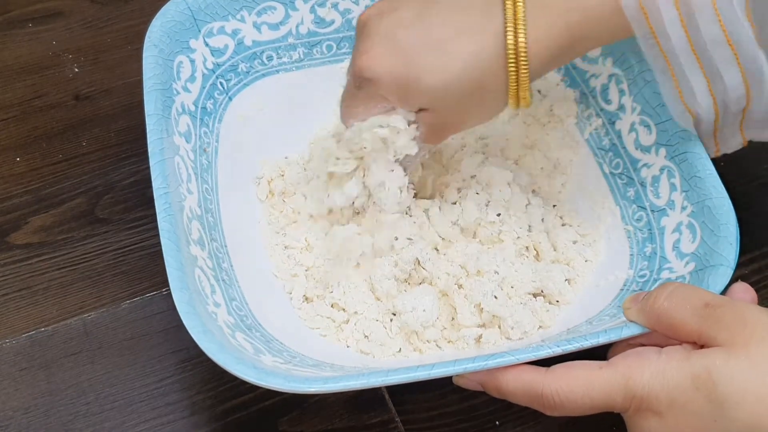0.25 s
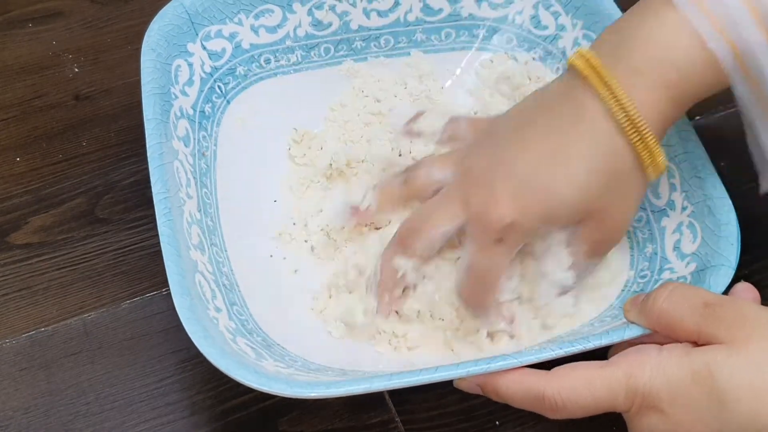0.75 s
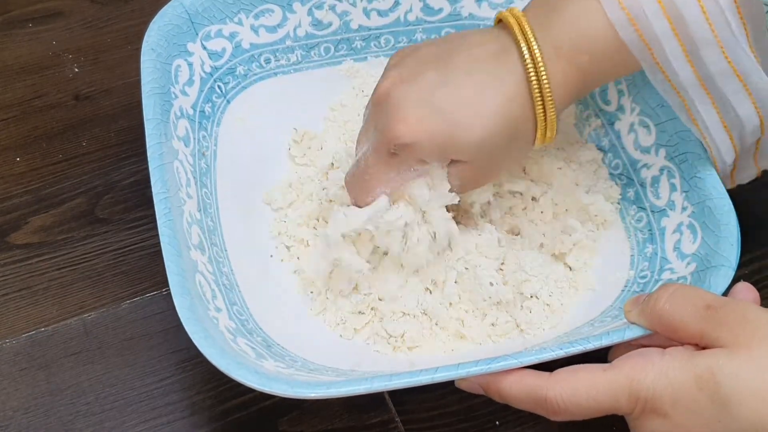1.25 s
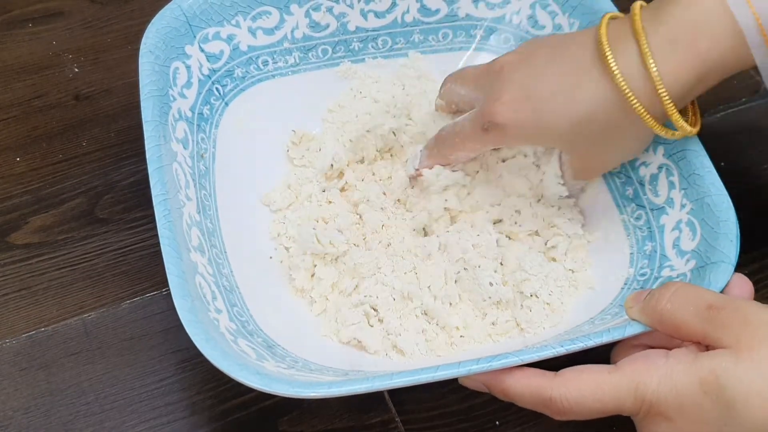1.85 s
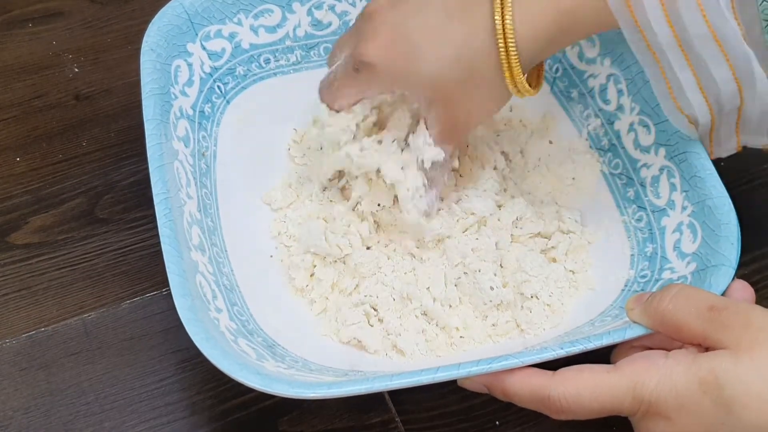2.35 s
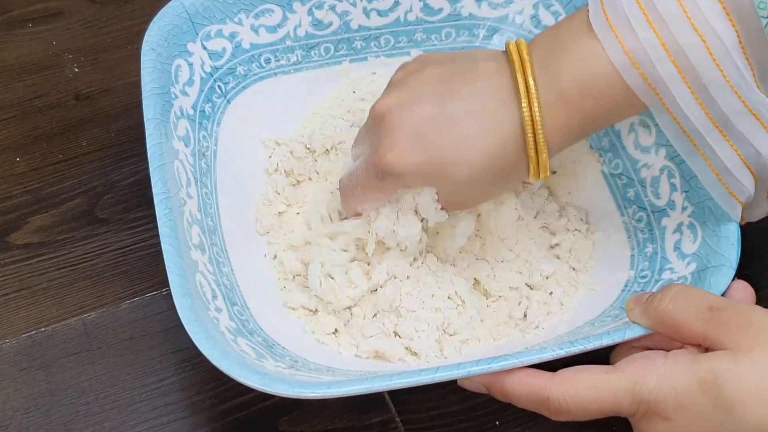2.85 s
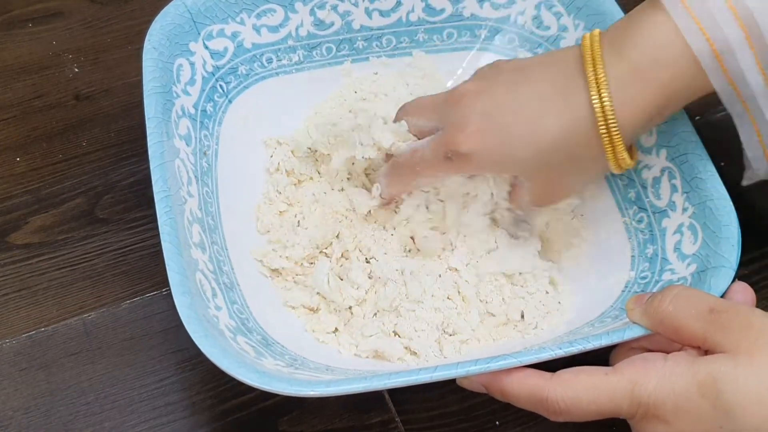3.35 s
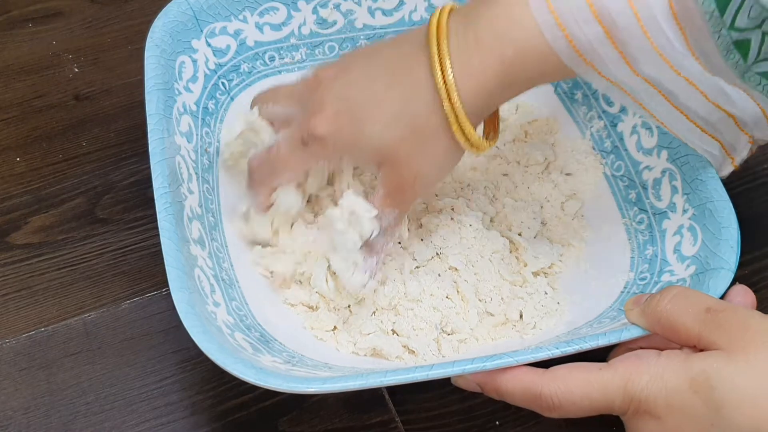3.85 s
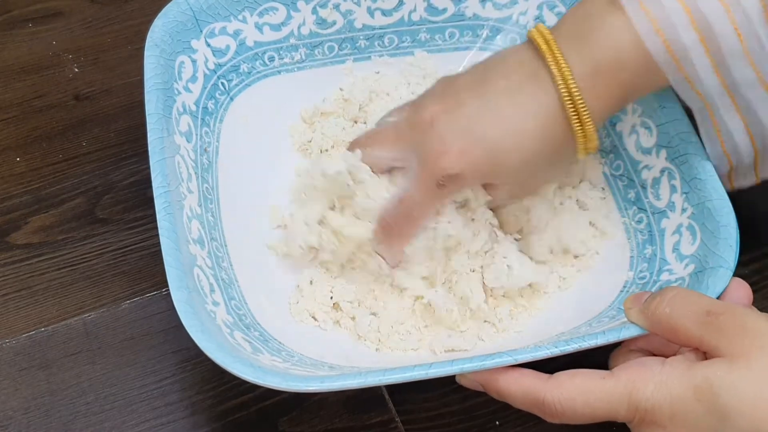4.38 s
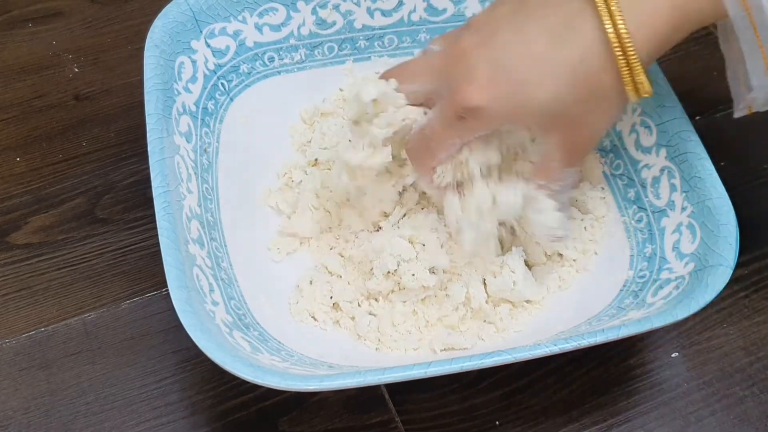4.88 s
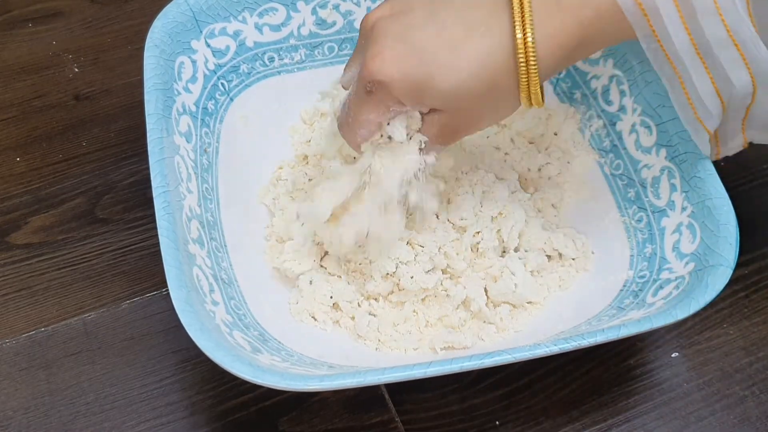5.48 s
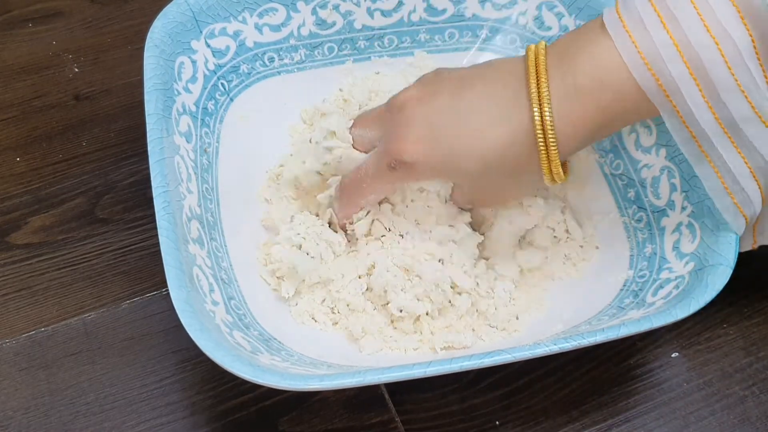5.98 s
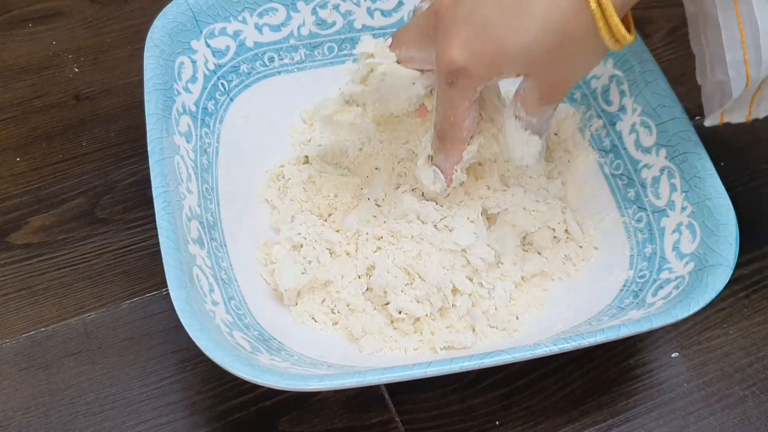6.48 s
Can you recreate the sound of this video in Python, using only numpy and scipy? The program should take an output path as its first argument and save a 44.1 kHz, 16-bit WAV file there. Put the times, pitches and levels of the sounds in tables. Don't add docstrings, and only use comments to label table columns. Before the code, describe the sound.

Dry, grainy rubbing of flour crumbs comes in uneven swishes, close to the microphone, above a wavering low hum. Tiny thin metallic tinkles and small ticks dot it. Two sharp plastic clacks with rattling slides stand out early and midway; the first is much louder. After the busiest raking comes a dull wooden bump with a quick wobble, then quieter strokes and a few taps in a short, hard-walled room.

```python
import sys
import numpy as np
from scipy import signal
from scipy.fft import rfft, irfft, next_fast_len
from scipy.io import wavfile
from scipy.ndimage import uniform_filter1d

SR = 44100
rng = np.random.default_rng(int(sys.argv[2]) if len(sys.argv) > 2 else 0)


def boost_factor(decibels):
    exponent = np.asarray(decibels, float) / 20
    return 10 ** exponent


def pcm_store(signal):
    levels = np.round(np.clip(np.atleast_2d(signal), -1, 1) * 32767)
    wavfile.write(sys.argv[1], SR, levels.astype(np.int16).T)


N = 296660

# (peak time [s], level [dB], rise over 20 dB [s], fall over 20 dB [s])
STROKES = [(0.03, -72, 0.15, 0.049), (0.218, -82, 0.2, 0.21), (0.5, -73, 0.3, 0.14),
           (0.59, -51, 0.084, 0.37), (0.76, -60, 0.45, 0.14), (1.0, -67.5, 0.13, 0.31),
           (1.39, -69, 0.064, 0.12), (1.65, -63, 0.024, 0.419), (1.76, -56, 0.15, 0.279),
           (2.04, -81.5, 0.049, 0.29), (2.382, -75, 0.037, 0.039), (2.611, -61, 0.27, 0.145),
           (2.77, -68.5, 0.32, 0.26), (3.333, -58, 0.17, 0.13), (3.481, -73.5, 0.33, 0.14),
           (3.77, -94.5, 0.35, .1), (3.98, -55.5, 0.074, 0.3), (4.089, -54, 0.3, 0.19),
           (4.19, -60, 0.23, 0.055), (4.31, -56, 0.033, 0.12), (4.345, -52.5, 0.073, 0.11),
           (4.5, -73.5, 0.11, 0.56), (4.66, -76.5, 0.16, 0.23), (4.86, -74, 0.21, 0.39),
           (4.975, -62, 0.015, 0.27), (5.04, -62, 0.099, 0.29), (5.45, -76.5, 0.57, 0.99),
           (5.79, -60.5, 0.029, 0.27), (5.869, -53, 0.11, 0.05), (6.02, -76.5, .3, 1),
           (6.5, -99, 0.43, 0.29)]
# (peak time [s], level [dB], rise over 20 dB [s], fall over 20 dB [s])
SLIDES = [
    (1.898, -57, 0.11, 0.073),
    (1.991, -52.5, 0.094, 0.031),
    (3.25, -46.5, 0.051, 0.012),
    (4.972, -77, 0.0075, 0.1),
    (5.015, -78, 0.035, .04),
]
# (frequency [Hz], density [dB per Hz])
CRUMB_SPECTRUM = [(470, -24.5), (800, -17.5), (1050, 0), (1800, -4.5), (2310, -8.5), (2520, -2.5),
                  (4830, -5.5), (5330, -4), (11000, -4), (15800, -4.5)]
# (frequency [Hz], width [Hz], level [dB])
WALL_RESONANCES = [(1852, 100, 3.5), (2960, 60, -3.5), (3350, 70, -2), (3700, 68, 0), (4770, 44, 6),
                   (6770, 250, -4), (10910, 730, 2.5)]
# (time [s], crack [dB], first ring [dB], second ring [dB], low ring [dB])
BLOWS = [(1.7693, -11.5, -40, -40, -24), (1.7717, -25, -16.5, -24, -42), (1.775, -17.5, -19.5, -13.5, -41),
         (1.7814, -34, -36, -30, -36), (1.7875, -29, -34, -41, -38), (1.7974, -28, -38, -41, -32),
         (1.8107, -29, -50, -44, -44), (1.8231, -29, -30, -23.5, -45), (1.836, -35, -45, -30, -45.5),
         (1.8708, -36, -25.5, -39.5, -49), (1.8814, -55, -28, -34, -48), (1.8956, -54, -34, -39, -45),
         (1.9178, -61, -44, -44, -47), (1.925, -64, -42, -46, -48), (1.933, -63, -38, -39, -58),
         (1.942, -58, -45, -49, -60), (1.954, -50, -44, -39, -49), (1.966, -55, -48, -36, -52),
         (1.9727, -50, -45, -37, -50), (1.982, -53, -46, -36, -57), (1.988, -59, -45, -36, -53),
         (1.997, -55, -50, -45, -58), (2.01, -63, -56, -48, -59), (2.026, -70.5, -59, -55, -65.5),
         (3.2118, -22, -35, -38, -35.5), (3.213, -34, -22.5, -28, -37), (3.2174, -37, -23.5, -37, -47),
         (3.2222, -37, -25, -33, -47), (3.23, -40, -28.5, -30, -45), (3.2354, -37, -39, -38, -43),
         (3.245, -49, -52, -52, -48), (3.26, -58, -52, -52, -55), (3.2652, -55, -52, -54, -61),
         (3.286, -57, -49, -62, -64)]
# (frequency [Hz], level [dB], t60 [s])
BASE_MODES = [(720, -12, .04), (950, -3, .045), (1050, -7, .03), (1145, -2, .055), (1290, -10, .03),
              (1550, -7, .02)]
# (frequency [Hz], level [dB], t60 [s])
FIRST_MODES = [(1735, -15, .03), (1785, -13, .03), (1880, -13, .03), (1904, 0, .042), (1988, -13, .035),
               (2068, -12, .035), (2135, -12, .035), (2320, -16, .03)]
# (frequency [Hz], level [dB], t60 [s])
SECOND_MODES = [(2560, -17, .03), (2790, -14, .035), (2938, 0, .055), (2985, -8, .04), (3060, -17, .04),
                (3220, -10, .04), (3290, -10, .04), (3400, -8, .04), (3595, -14, .035)]
# (frequency [Hz], level [dB], t60 [s])
RIM_MODES = [(3306, -1, .03), (3420, 0, .03), (3607, 3, .03), (3711, -5, .03), (4025, -12, .025),
             (4480, -10, .02), (4785, 3, .02), (5200, -7, .02), (5520, -4, .016), (5900, 2, .016),
             (6080, -1, .016), (6770, -6, .02), (7140, -7, .018), (9620, -16, .015)]
# (time [s], body [dB], deep bump [dB], knock [dB])
THUDS = [(0.027, -42.5, -53, -60), (0.614, -37.5, -69, -62), (1.7704, -25, -55, -44),
         (1.7742, -44, -55, -34), (1.792, -38, -62, -56), (3.213, -32.5, -63, -45.5),
         (3.2188, -41, -56, -61), (4.046, -42, -61, -93), (4.97, -69, -47, -66),
         (5.0531, -23.5, -57, -45.5), (5.065, -48, -51, -55), (5.085, -39, -62, -58),
         (5.093, -28, -46.5, -49.5), (5.108, -41, -59, -73), (5.3432, -37.5, -64, -58.5),
         (5.367, -44, -56, -73), (5.399, -56, -53, -62), (5.427, -55, -56, -68.5),
         (5.445, -57.5, -54.5, -59), (5.848, -48, -49, -71.5)]
# (frequency [Hz], level [dB], t60 [s])
TABLE_MODES = [(230, 0, .034), (165, -9, .05), (293, -8, .06), (355, -12, .05), (127, -18, .08)]
# (frequency [Hz], level [dB], t60 [s])
DEEP_MODES = [(80, 0, .14), (52, -8, .12)]
# (frequency [Hz], level [dB], t60 [s])
KNOCK_MODES = [(472, 0, .07), (555, -14, .04), (850, -10, .035), (1120, -13, .035)]
# (time [s], level [dB])
ROCKS = [
    (5.363, -40),
    (5.393, -40),
    (5.4173, -43),
    (5.438, -43),
]
# (frequency [Hz], level [dB], t60 [s])
ROCK_MODES = [(125, 0, .045), (180, -7, .04), (305, -5, .05)]
# (time [s], upper ring [dB], lower ring [dB])
JINGLES = [(0.17, -83, -90), (0.273, -70, -85), (0.2804, -74, -82), (0.3192, -82, -81), (0.343, -77, -86),
           (0.6833, -60, -66), (0.776, -65, -68), (1.1114, -79, -69.5), (1.2211, -80, -87),
           (1.4207, -71, -72), (1.5798, -68, -68), (1.772, -35, -46), (1.786, -51, -54), (2.041, -54, -51),
           (2.047, -55, -51.5), (2.062, -61, -66.5), (2.0802, -53, -58), (2.0914, -62, -67),
           (2.104, -68, -70), (2.122, -74, -74.5), (2.4414, -73, -72), (2.913, -61.5, -66.5),
           (2.921, -69, -79), (3.034, -84, -71), (3.0729, -75, -85), (3.622, -69.5, -78.5),
           (3.742, -67.5, -71), (4.4454, -87.5, -71), (4.4955, -67, -68), (4.6154, -73, -71),
           (4.6299, -63.5, -79), (4.6892, -73, -81), (4.827, -71.5, -78), (4.8703, -64.5, -75),
           (5.4136, -75.5, -74), (5.55, -80, -80), (6.6354, -93, -80.5)]
# (frequency [Hz], level [dB], t60 [s])
UPPER_MODES = [(10780, -2, .04), (10900, 0, .045), (11080, 0, .045), (11230, -5, .04)]
# (frequency [Hz], level [dB], t60 [s])
LOWER_MODES = [(7750, 0, .06), (7880, -4, .045), (7630, -8, .04)]
# (frequency [Hz], level [dB], t60 [s])
SIDE_MODES = [(5400, -6, .05), (6320, -7, .03), (7300, -6, .04), (9960, -1, .035), (10400, 0, .03),
              (11700, -4, .03), (12500, -3, .04), (13000, -8, .03), (14300, -5, .03), (15300, -6, .05)]
# (time [s], level [dB], pitch [Hz], snap re ring [dB])
NAIL_TICKS = [(0.3894, -69, 6770, 8), (1.371, -68, 6070, 3), (1.4012, -56, 5000, -9),
              (1.6392, -58, 4750, -1), (2.3665, -69.5, 6700, -0.5), (2.3795, -62, 6500, -5),
              (3.1353, -72.5, 4430, 8), (3.1444, -74, 4220, 6), (3.199, -60, 3880, 16),
              (3.7964, -59.5, 5670, 3.5), (3.8965, -59.5, 5000, 10.5), (4.5696, -69, 6700, 6),
              (4.8264, -62.5, 6260, 8), (4.9726, -65, 4770, 3), (5.2674, -69, 5870, -14),
              (5.3774, -73.5, 5660, 8), (5.8488, -52, 6500, 0), (6.3914, -52.5, 7040, -4),
              (3.177, -64, 3000, 1)]
# (time [s], level [dB], pitch [Hz], snap re ring [dB])
DULL_TICKS = [(0.4883, -54, 3000, -6), (1.4009, -50, 3550, 0), (3.6232, -64, 1904, -14),
              (3.7818, -58.5, 1900, 4.5), (3.783, -53.5, 3620, -3), (4.5795, -45, 1825, -21.5),
              (4.581, -58, 3000, -13), (4.9705, -49, 2970, -16), (4.99, -51, 3100, -13),
              (5.0085, -51, 2560, -12), (5.022, -47, 2980, -8), (5.031, -53.5, 2940, -9.5),
              (5.8496, -47.5, 3690, -9.5), (5.3429, -56, 1130, -8.5), (6.3924, -47, 2113, -13.5),
              (6.3926, -54, 1656, -13), (6.395, -58, 5190, -22), (6.393, -60.5, 840, -18),
              (4.59, -53, 1810, -21.5), (4.973, -52.5, 3520, -10), (4.992, -57, 2580, -9),
              (4.994, -55.5, 3490, -13.5), (5.811, -55.5, 2500, -13), (5.86, -50, 1470, -13.5),
              (5.88, -49.5, 1480, -11)]
# (frequency [Hz], left over right [dB])
FACING = [(300, 1.5), (470, -4.5), (1000, 6.5), (1500, -5), (1950, 3.5), (2900, -1.5), (3500, -3),
          (5900, -6), (7800, 9), (11000, -4.5), (13500, 4.5)]
# (frequency [Hz], t60 [s])
KITCHEN_T60 = [(100, 0.0774), (500, 0.35), (2000, 0.21), (6000, 0.18), (14000, 0.0924)]
# (frequency [Hz], left-right likeness [0-1])
LIKENESS = [(60, 0.93), (250, 0.98), (500, 0.24), (1000, 0.032), (2000, 0.0255), (8000, 0.017)]
# (frequency [Hz], left over right [dB])
DIFFUSE_LEAN = [(60, 1), (180, -1.5), (550, -1), (1650, 0.5), (4970, -3), (15000, 2)]
# (frequency [Hz], density [dB per Hz])
DRONE_SPECTRUM = [(20, -22.5), (40, -19), (60, 2), (110, -11.5), (200, -7.5), (400, -31.5), (560, -14),
                  (720, -15), (800, -24.5), (2000, -29), (2400, -32), (7800, -47.5), (8800, -69),
                  (10800, -49.5), (15800, -55)]
# (frequency [Hz], width [Hz], level [dB])
HUMS = [(73.1, 3.3, -56), (212.5, 26, -60.5), (296, 27, -57.5), (371.4, 18, -59), (473.7, 7.6, -62.5)]


def evened(x):
    return x / np.sqrt(np.mean(x ** 2) + 1e-20)


def read(points, hz):
    f, value = np.transpose(points)
    return np.interp(np.log(hz + 1), np.log(f + 1), value)


def add(mix, s, sound):
    part = mix[round(s * SR):][:len(sound)]
    part += sound[:len(part)]


def patchiness(shape, bands, frames):
    grain = uniform_filter1d(rng.standard_normal(shape), bands, 0)
    return evened(uniform_filter1d(grain, frames, 1))


def port_pair(z, hz):
    same = np.clip(read(LIKENESS, hz), 0, 1)[:, None]
    lean = boost_factor(read(DIFFUSE_LEAN, hz)[:, None] / 2)
    right = same * z[0] + np.sqrt(1 - same ** 2) * z[1]
    return np.array([z[0] * lean, right / lean])


def ring(modes, contact_s, cycles=0.37):
    hz, db, t60_s = np.transpose(modes)[:, :, None]
    t = np.arange(int(0.9 * t60_s.max() * SR)) / SR
    touch_s = np.arange(2000) / SR
    jolts = 0.48 * rng.standard_normal(2000) * (rng.random(2000) < 0.05)
    jolts *= np.exp(-touch_s / (contact_s + 1e-4))
    jolts[0] = 1
    hit = jolts != 0
    force = abs(np.exp(2j * np.pi * hz * touch_s[hit]) @ jolts[hit])[:, None]
    force = force + 0.5 * np.linalg.norm(jolts)
    spread, phase = rng.random((2, len(modes), 1))
    level_db = db + 5 * (spread - 1) * (db < 0)
    pitch_hz = hz * (1 + 0.004 * (spread - 0.5))
    rise = 1 - np.exp(-(hz * t / cycles) ** 2)
    tone = np.sin(2 * np.pi * (pitch_hz * t + phase * (hz > 600)))
    tone *= rise * boost_factor(level_db - 60 * t / t60_s) / force
    sound = signal.fftconvolve(tone.sum(0), jolts)
    return sound / abs(sound).max()


def snap(t60_s, top_hz):
    t = np.arange(4000) / SR
    burst = rng.standard_normal(4000) * boost_factor(-60 * t / t60_s)
    burst = signal.lfilter(*signal.butter(1, [1200, top_hz], "band", fs=SR), burst)
    return signal.lfilter(*signal.butter(1, 2.5 * top_hz, fs=SR), burst)


def pressure(t, strokes):
    s, db, rise_s, fall_s = np.transpose(strokes)[:, :, None]
    away = np.where(t < s, (s - t) / rise_s, (t - s) / fall_s)
    rounding = 1.01
    return np.sum(boost_factor(db - 20 * away ** rounding) ** 2, 0)


def rubbing():
    slips_per_s, rest_db = 5000, -95
    size_db = 2.2 * np.minimum(rng.exponential(1, (N, 1)), 4)
    slips = rng.standard_normal((N, 2)) * boost_factor(size_db) * (rng.random((N, 1)) < slips_per_s / SR)
    grains = evened(slips.T) + 0.95 * rng.standard_normal((N, 2)).T
    hz, t, z = signal.stft(grains, SR, nperseg=512, noverlap=384)

    wall = sum(0.79 * boost_factor(db) / (1 + (2 * (hz - f) / (w + 40)) ** 2) for f, w, db in WALL_RESONANCES)
    colour = boost_factor(read(CRUMB_SPECTRUM, hz)) * (1 + wall)
    colour /= np.sqrt(np.sum(colour[(hz > 2500) & (hz < 7000)] ** 2) / len(hz))

    hand = pressure(t, STROKES) + boost_factor(rest_db) ** 2
    slide = pressure(t, SLIDES)
    level_db = 10 * np.log10(hand + slide)
    sliding = slide / (hand + slide)
    hiss_db = -17.5 + 0.2155 * (level_db + 75.5) - 22.5 * sliding
    drag_db = 9 - 0.5687 * (level_db + 79) + 7 * sliding
    high = np.clip((hz - 6000) / 7000, 0, 1)[:, None]
    low = np.clip((2600 - hz) / 900, 0, 1)[:, None]
    patches = patchiness(z.shape[1:], 5, 12)
    field_db = level_db + high * hiss_db + low * drag_db + 1.61 * patches
    field = port_pair(z, hz) * colour[:, None] * boost_factor(field_db)
    return 0.66 * signal.istft(field, nperseg=512, noverlap=384)[1][:, :N]


def bowl():
    rings, cracks = np.zeros((2, N))
    for s, crack_db, first_db, second_db, low_db in BLOWS:
        parts = ((crack_db + 3, RIM_MODES), (first_db - 1, FIRST_MODES),
                 (second_db + 0.5, SECOND_MODES), (low_db - 1.5, BASE_MODES))
        for db, modes in parts:
            add(rings, s, boost_factor(db) * ring(modes, contact_s=0.0005))
        top_hz = max(5000 * boost_factor(0.074 * (crack_db + 17)), 1500)
        add(cracks, s, boost_factor(crack_db - 6.5) * snap(0.039, top_hz))
    return rings, cracks


def table():
    out = np.zeros(N)
    for s, body_db, deep_db, knock_db in THUDS:
        parts = ((body_db, TABLE_MODES), (deep_db + 0.5, DEEP_MODES), (knock_db + 7.5, KNOCK_MODES))
        for db, modes in parts:
            add(out, s + 0.0005, -boost_factor(db) * ring(modes, contact_s=0.0002, cycles=1.8))
    for s, db in ROCKS:
        add(out, s, -boost_factor(db) * ring(ROCK_MODES, contact_s=0.0002, cycles=1.0))
    return signal.lfilter(*signal.butter(2, 1500, fs=SR), out)


def bangles():
    out = np.zeros(N)
    for s, upper_db, lower_db in JINGLES:
        sides_db = -75 + 1.4 * ((upper_db + lower_db) / 2 + 70)
        for db, modes in ((upper_db, UPPER_MODES), (lower_db + 5, LOWER_MODES), (sides_db, SIDE_MODES)):
            add(out, s, boost_factor(db) * ring(modes, contact_s=0.019))
    return out


def ticks():
    out = np.zeros(N)
    for rows, t60_s in ((NAIL_TICKS, 0.036), (DULL_TICKS, 0.037)):
        for s, db, hz, snap_db in rows:
            pair = [(hz, 0, t60_s), (1.05 * hz, -9, 0.7 * t60_s)]
            add(out, s, boost_factor(db) * ring(pair, contact_s=0.004))
            add(out, s, boost_factor(db + snap_db - 1) * snap(0.025, top_hz=8000))
    return out


def kitchen(rings, cracks, inside):
    ring_wet_db, crack_wet_db, inside_wet_db = -10, 4, -13
    port_lag = 20
    taps = np.zeros((2, SR // 2))
    at = np.arange(100, SR // 2 - 20, 20) + rng.integers(0, 20, (2, (SR // 2 - 101) // 20))
    np.put_along_axis(taps, at, rng.choice([-1., 1.], at.shape), 1)
    hz, t, z = signal.stft(taps, SR, nperseg=512)
    decay = boost_factor(-60 * t / read(KITCHEN_T60, hz)[:, None])
    tail = signal.istft(port_pair(z, hz) * decay, SR, nperseg=512)[1]
    tail /= np.linalg.norm(tail[0])

    sent = boost_factor(ring_wet_db) * rings + boost_factor(crack_wet_db) * cracks + boost_factor(inside_wet_db) * inside
    sent = signal.lfilter(*signal.butter(1, 450, "high", fs=SR), sent)
    wet = signal.fftconvolve(sent[None], tail, axes=1)[:, :N]

    direct = rings + cracks + inside
    bass = signal.filtfilt(*signal.butter(3, 1400, fs=SR), direct)
    ports = np.array([direct, bass + np.roll(direct - bass, port_lag)])
    size = next_fast_len(N)
    lean = boost_factor(read(FACING, np.fft.rfftfreq(size, 1 / SR)) / 2)
    return irfft(rfft(ports, size) * [lean, 1 / lean], size)[:, :N] + wet


def drone():
    hz, frames = np.fft.rfftfreq(2048, 1 / SR), N // 512 + 5
    real, imag = rng.standard_normal((2, 2, len(hz), frames))
    patches = patchiness((len(hz), frames), 10, 8)
    wide = boost_factor(read(DRONE_SPECTRUM, hz))
    wide *= boost_factor(-53.5) / np.linalg.norm(wide)
    hums = sum(boost_factor(2 * db) / (1 + (2 * (hz - f) / w) ** 2) / (w / 14) for f, w, db in HUMS)
    level = np.sqrt(wide ** 2 + hums)[:, None] * boost_factor(0.9 * patches)
    z = port_pair(real + 1j * imag, hz) * level
    return 0.83 * signal.istft(z, nperseg=2048, noverlap=1536)[1][:, :N]


def scene():
    rings, cracks = bowl()
    knocks = kitchen(rings + table() + bangles(), cracks, ticks())
    return rubbing() + knocks + drone()


def low_pass(x):
    return signal.sosfilt(signal.butter(12, 16270, fs=SR, output="sos"), x)


def record(dry):
    mix = signal.sosfilt(signal.butter(16, 15600, fs=SR, output="sos"), dry)
    return low_pass(mix)


dry = scene()
out = record(dry)
pcm_store(out)
```